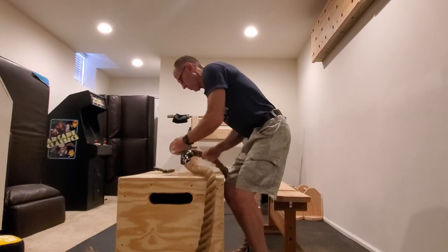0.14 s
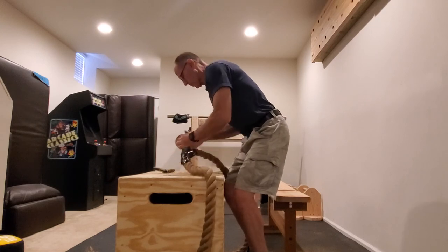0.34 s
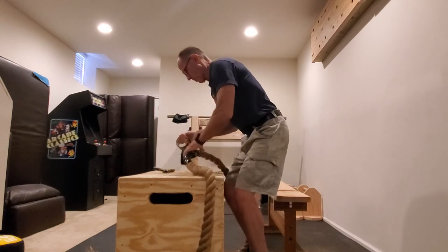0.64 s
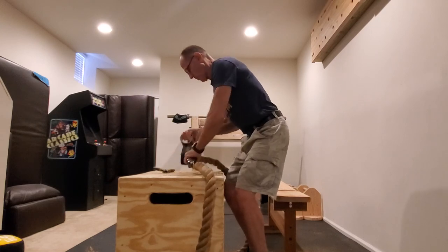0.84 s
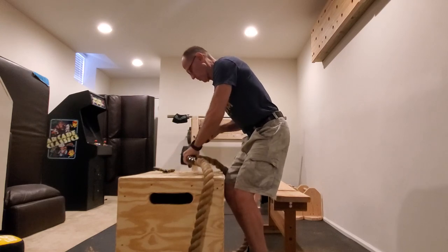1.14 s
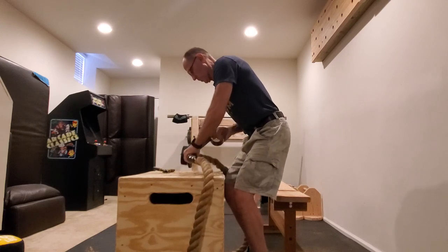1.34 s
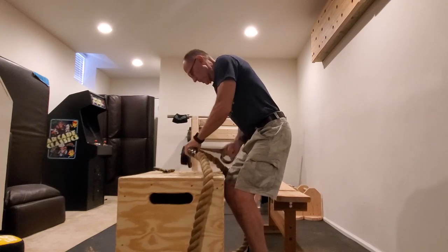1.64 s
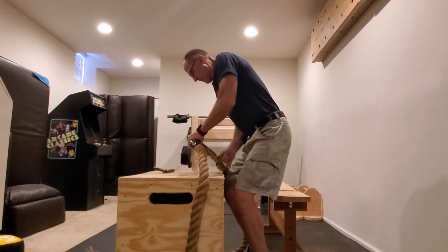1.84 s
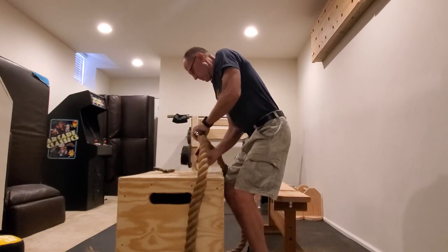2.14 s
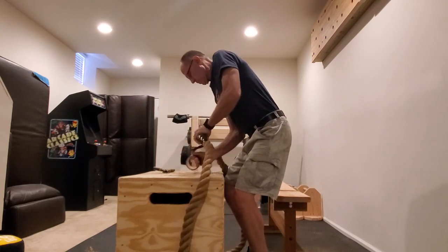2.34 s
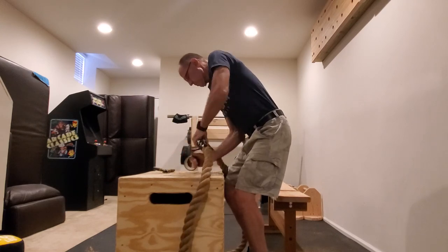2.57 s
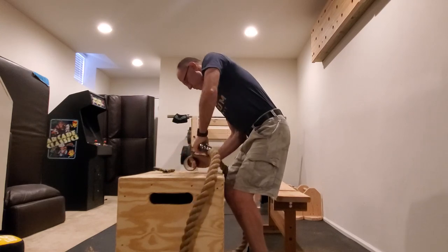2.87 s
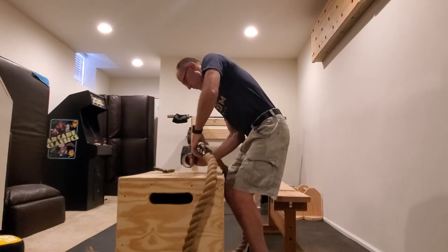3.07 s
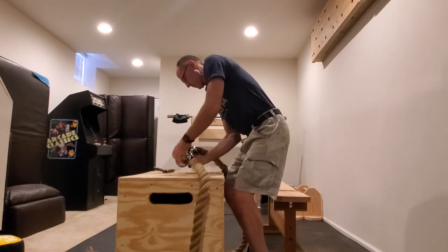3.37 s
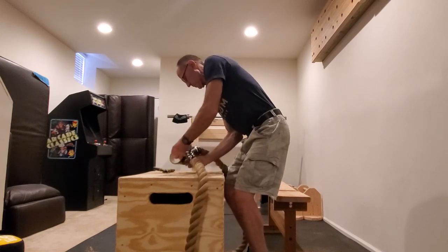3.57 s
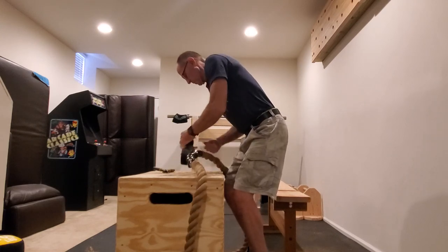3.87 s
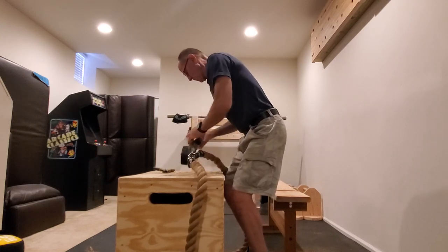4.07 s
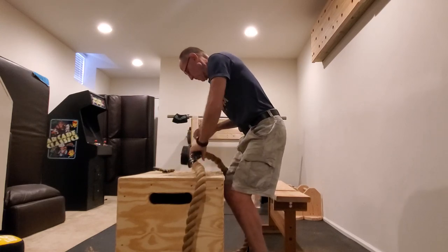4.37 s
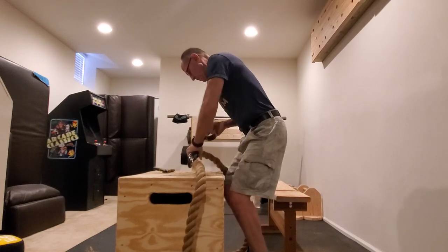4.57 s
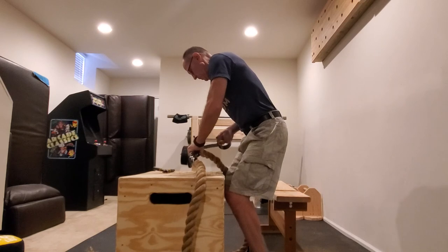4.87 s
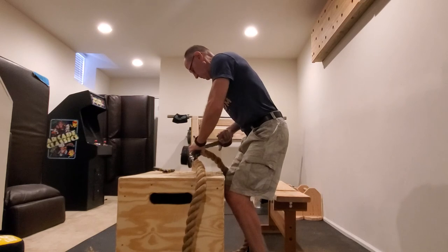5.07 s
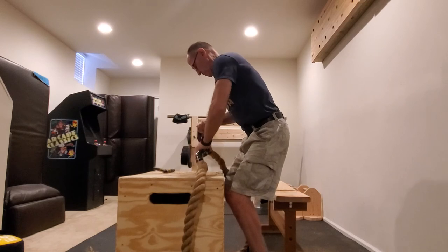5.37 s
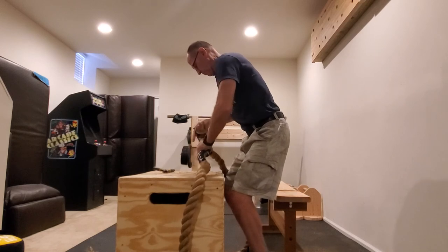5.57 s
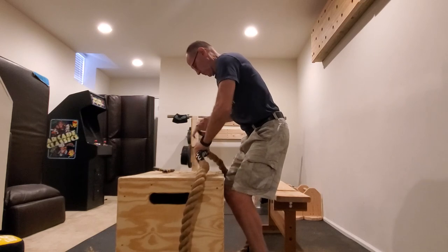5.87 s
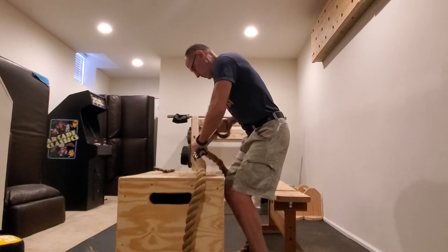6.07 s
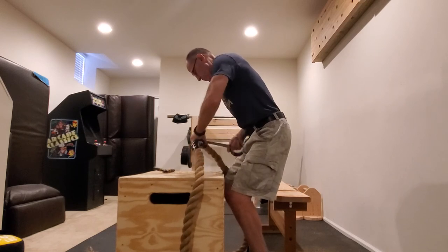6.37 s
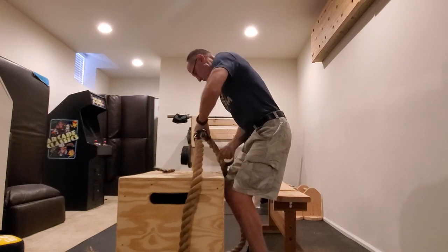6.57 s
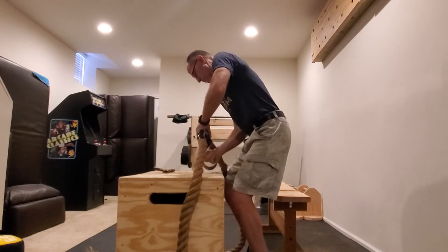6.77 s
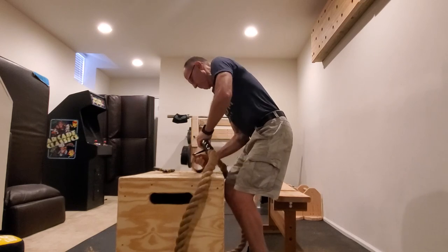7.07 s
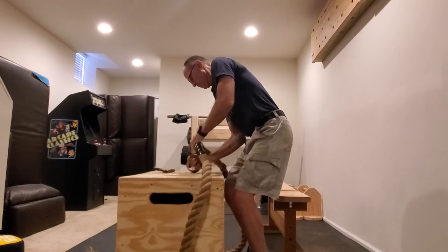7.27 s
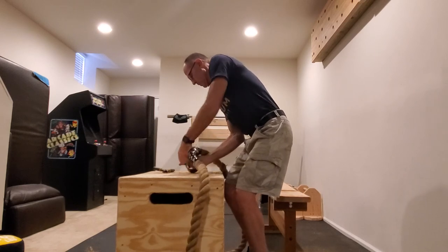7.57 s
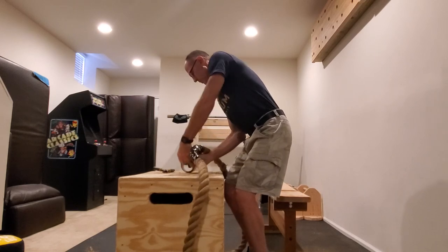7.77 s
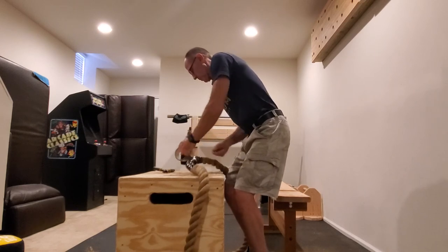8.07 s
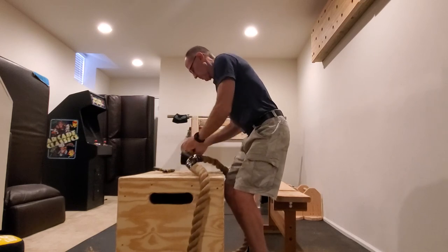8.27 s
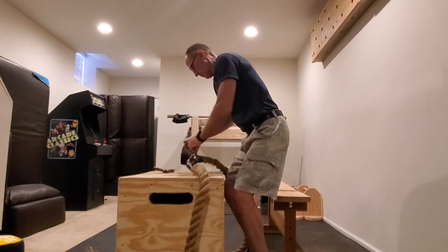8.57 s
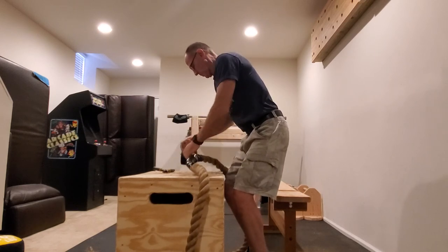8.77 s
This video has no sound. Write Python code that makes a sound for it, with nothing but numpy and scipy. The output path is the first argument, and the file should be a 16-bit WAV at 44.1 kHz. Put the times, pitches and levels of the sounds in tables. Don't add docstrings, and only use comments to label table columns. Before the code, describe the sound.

Loud jerky rips of cloth tape pulled off its roll and wound on thick rope, with crackles and hollow plywood bumps in a bare basement.

```python
import sys
import numpy as np
from scipy import signal
from scipy.fft import rfft, irfft
from scipy.io import wavfile
from scipy.ndimage import uniform_filter1d

SR = 44100
rng = np.random.default_rng(int(sys.argv[2]) if len(sys.argv) > 2 else 0)


def rack_gain(trim_db):
    fader = np.asarray(trim_db, float)
    return 10 ** (fader / 20)


def dump(signal):
    limited = np.clip(np.atleast_2d(signal).T, -1, 1)
    pcm = np.round(limited * 32767).astype(np.int16)
    wavfile.write(sys.argv[1], SR, pcm)


N = 393811

# t/s, length/s, snap level/dB, drumming re
# snap level/dB, swell over the jerk/dB
PULLS = [(0.7414, 0.046, -24, -5, 6.5), (0.789, 0.024, -32.5, -3, -6.5), (0.868, 0.015, -18.5, 0, -5),
         (0.945, 0.011, -22.5, -3, -6), (1.021, 0.018, -22.5, -1, -14),
         (1.076, 0.012, -20.5, -3.5, -10.5), (1.154, 0.016, -20, -5.5, -7.5),
         (1.2335, 0.043, -22.5, -3, -9.5), (1.283, 0.081, -26, -3, 1), (1.453, 0.042, -24.5, -3, -12),
         (1.524, 0.11, -25.5, -5, -8), (1.631, 0.04, -34, -14, 6), (1.77, 0.025, -31.5, -9, -5),
         (1.874, 0.011, -31, -19.5, -19), (1.939, 0.015, -24.5, -18, -4.5),
         (2.0345, 0.016, -28, -28.5, 6.5), (2.2656, 0.014, -21, -34.5, -16.5),
         (4.349, 0.0047, -37, -6.5, 0), (4.353, 0.048, -38.5, -8, -9.5), (4.4192, 0.006, -30, -5, -1),
               (4.425, 0.062, -20.5, -7.5, -1.5), (4.521, 0.021, -28, -0.5, -10.5),
               (4.7134, 0.048, -22, -10, 2), (4.795, 0.011, -27.5, -10.5, 2),
               (6.085, 0.016, -25.5, -4.5, -15), (6.11, 0.015, -20, -2.5, -5),
               (6.1458, 0.01, -20, -8.5, -5), (6.175, 0.011, -23, -12, -13.5),
               (6.2813, 0.012, -30, -8, -10.5), (6.329, 0.03, -35, -10, -4), (6.379, 0.027, -23, -22.5, -4),
               (6.5185, 0.022, -24, -14, -4)]
WRAPS = [(0.022, 0.011, -42, -14, -6), (0.43, 0.056, -47, -10, -6), (0.529, 0.017, -37.5, -7.5, -10.5),
         (0.5747, 0.017, -40.5, -7, -16), (2.7405, 0.068, -57.5, -16.5, -6), (3.045, 0.03, -48.5, -13, -2),
         (3.106, 0.0055, -42, -10.5, 3), (3.561, 0.012, -40.5, -14, -1), (3.574, 0.045, -36.5, -11.5, 7),
         (3.672, 0.084, -47.5, -1, -1.5), (4.175, 0.04, -60.5, -22, 5), (5.078, 0.0042, -53, -31, -4),
         (5.179, 0.08, -46.5, -12, -1), (5.2555, 0.034, -38.5, -10, 3), (5.29, 0.038, -36, -16.5, -1),
         (5.506, 0.045, -36.5, -12, -2.5), (5.734, 0.032, -34.5, -12.5, -11.5),
         (6.805, 0.013, -28.5, -28.5, -19), (7.5052, 0.004, -46, -12, .5), (7.509, 0.07, -43, -13, -17),
         (7.88, 0.033, -55.5, -6.5, -6), (8.034, 0.023, -63, 5, -5), (8.424, 0.014, -48, -21, 2.5),
         (8.6554, 0.025, -36, -16, -22)]
# t/s, length/s, snap level/dB, drumming re snap level/dB
CREEPS = [(0.001, 0.013, -50, -13), (0.371, 0.069, -70, -17), (2.596, 0.11, -61, -34),
          (2.993, 0.07, -62.5, -25), (3.07, 0.07, -70, -18), (3.181, 0.17, -62, -1.5),
          (3.297, 0.14, -58.5, -4), (3.437, 0.14, -68, -6), (4.053, 0.12, -82, -29),
          (4.256, 0.07, -66, -18), (5.038, 0.059, -77, -30), (5.965, 0.044, -59, -17),
          (6.956, 0.097, -64, -10), (7.1, 0.14, -63.5, -12), (7.254, 0.032, -57.5, -11.5),
          (7.41, 0.1, -66, -34), (7.969, 0.079, -60, -19), (8.272, 0.02, -86, 3), (8.606, 0.09, -61.5, -16)]
CREEP_SWELL_DB, CREEP_ATTACK_S, JERK_ATTACK_S = -3, 0.011, 0.0003
# t/s, flutter of the peel line f/Hz, hiss re snap level/dB
ROLL_ANGLE = [(0, 3600, 0), (.55, 4200, 0), (.75, 3100, -2.5), (1.2, 2760, -4.5), (1.55, 2400, 0.5),
              (1.78, 3200, -15), (2.03, 5500, 0.5), (2.3, 4000, -2.3), (3.0, 5200, 3.5), (3.2, 3200, -5),
              (4.2, 5190, 4), (4.45, 2920, -3.5), (5.15, 4300, 3.5), (5.5, 2900, -0.5), (6.15, 3480, -2.5),
              (6.4, 3950, 0.5), (8.05, 4630, 0.5), (8.6, 5150, -3)]
TIGHT_FOLLOWS = 0.13
BODY_DB, BODY_FOLLOWS = -1, 0.54

# f/Hz, width/Hz, level/dB
STRIP_MODES = [(197, 18, 0), (307.7, 30, -3.5), (447, 26, -18), (608, 40, -10.5), (720, 45, -14),
               (974, 35, -7)]
# f/Hz, level per Hz/dB
DRUM_SPECTRUM = [(50, -58), (80, -21), (250, -10), (500, -3.5), (800, -1), (1100, -4), (1600, -29.5),
                 (3000, -50)]
# f/Hz, level per Hz/dB
BODY_SPECTRUM = [(500, -32.5), (900, -13), (1300, -0.5), (2000, 0), (2600, -5), (4500, -43.5)]
# f/Hz, level per Hz/dB
SNAP_SPECTRUM = [(800, -56.5), (1500, -31), (2200, -7.5), (3000, 5.5), (4600, 4), (6700, 7), (7500, -11.5),
                 (10000, -31.5)]
# f/Hz, level per Hz/dB
HISS_SPECTRUM = [(4000, -29), (6800, -17), (7700, -8.5), (10000, -6.5), (12500, -6.5), (15000, -1.5),
                 (16500, 0)]

# t/s, peak level/dB
CRACKS = [(0.743, -19.5), (1.2344, -6.5), (1.2455, -10.5), (1.2638, -9.5), (1.2913, -6.5), (1.323, -11.5),
          (1.3534, -11), (1.361, -16), (1.453, -3.5), (1.4614, -5.5), (1.4895, -8), (1.5277, -11.5),
          (1.636, -10.5), (1.6498, -15), (1.7718, -17), (1.788, -22), (.877, -7.5), (0.783, -10.5),
          (1.281, -9), (1.3178, -10), (1.945, -12.5), (2.033, -7), (2.2722, -14), (2.2789, -10.5),
          (4.4762, -15.5), (4.517, -5), (4.5322, -13), (4.7484, -10.5), (6.117, -6), (6.1125, -6),
          (6.146, -8.5), (6.1786, -5), (6.2825, -12), (6.3797, -9), (6.5208, -13), (6.8063, -19.5)]
# f/Hz, level per Hz/dB
CRACK_SPECTRUM = [(200, -23), (800, -8.5), (3000, 4.5), (7000, -2), (8000, 0.5), (15000, -3)]
# t/s, peak level/dB
TICKS = [(0.742, -31.5), (0.7473, -24), (0.8699, -10), (0.8757, -11), (0.8808, -12), (0.9445, -7.5),
         (0.95, -11), (1.0218, -11.5), (1.0269, -11), (1.0308, -13.5), (1.0746, -8.5),
         (1.0815, -12.5), (1.1558, -16.5), (1.1621, -15.5), (1.1674, -14.5), (1.2351, -11),
         (1.2403, -16.5), (1.2446, -11.5), (1.2651, -9), (1.2731, -11.5), (1.291, -5.5), (1.304, -11),
         (1.3086, -12.5), (1.313, -12), (1.3297, -11), (1.3609, -8), (1.3774, -16), (1.4545, -13),
         (1.4621, -8.5), (1.4956, -9.5), (1.5006, -13), (1.527, -13), (1.5401, -9.5), (1.552, -14),
         (1.5679, -10), (1.5823, -12.5), (1.6024, -10.5), (1.6113, -11), (1.6212, -14),
         (1.6374, -16.5), (1.6506, -11.5), (1.6607, -16), (1.7733, -23.5), (1.7881, -23.5),
         (1.7932, -26.5), (1.81, -27), (1.8731, -32), (1.9417, -22.5), (1.9453, -12.5), (1.9509, -17),
         (1.958, -20.5), (1.9926, -25.5), (2.032, -16), (2.0384, -8), (2.2674, -12), (2.2717, -16),
         (2.2884, -16.5), (2.3041, -21.5),
         (3.0587, -43), (3.1101, -25), (3.1124, -32), (3.1183, -33), (3.5665, -37), (4.191, -34.5),
               (4.3505, -26.5), (4.3554, -23.5), (4.3726, -26), (4.4195, -24.5), (4.4837, -12),
               (4.5157, -14.5), (4.5211, -14.5), (4.5368, -15), (4.7153, -31), (4.7375, -15), (4.7499, -17),
               (4.7562, -13.5), (4.766, -16), (4.7923, -12.5), (4.802, -14), (5.1787, -28.5), (5.1825, -25),
               (5.1862, -26), (5.2024, -24), (5.4179, -32), (5.506, -34), (5.5124, -29), (5.519, -23),
               (5.7348, -31.5), (5.74, -25.5), (5.7574, -29.5), (5.774, -27.5), (6.0859, -15.5),
               (6.113, -18), (6.1148, -9.5), (6.1268, -14.5), (6.146, -9), (6.1501, -11.5), (6.1799, -13),
               (6.282, -17.5), (6.33, -18.5), (6.337, -19), (6.3415, -14), (6.351, -9), (6.3617, -18),
               (6.3802, -10), (6.387, -5.5), (6.4, -13.5), (6.5198, -12), (6.806, -24), (6.8289, -18),
               (6.9109, -38), (7.505, -30), (7.509, -35), (7.5275, -40), (8.4254, -32), (8.6557, -30)]
# f/Hz, level per Hz/dB
TICK_SPECTRUM = [(5000, -32), (7500, -20), (9000, -9), (12000, -3), (15000, 1.5), (17000, 0.5)]
TICK_DB, TICK_S, TICK_LEFT_DB, TICK_ROOM_DB, CRACK_NEAR_DB = 2.5, 0.00035, 8, -3.5, -4

# t/s, f/Hz, level/dB, held/s
STRIP_NOTES = [
    (1.235, 708, -26, .2),
    (1.16, 318, -33, .12),
    (1.24, 305, -31, .2),
    (3.69, 1250, -54, .3),
    (1.53, 967, -38, .1),
    (6.12, 200, -39, .2),
    (4.74, 970, -38, .05),
    (5.54, 199, -45, .15),
]
FADE_SHARE = 0.45

# t/s, f/Hz, peak level/dB, driven for/s
RINGS = [(.945, 280, -22, 0.04), (1.3, 300, -24.5, 0.061), (1.03, 1414, -19.5, 0.03),
         (2.27, 460, -34, 0.08), (6.1, 53, -28.5, .08), (8.04, 910, -55, 0.044),
         (6.81, 436, -42.5, 0.039), (3.68, 1200, -28, 0.0336), (3.575, 3210, -27.5, 0.044),
         (6.385, 3920, -16.5, 0.042), (6.52, 3500, -21, 0.03), (2.74, 3200, -41, .02),
         (3.69, 556, -32.5, 0.031), (8.661, 1036, -37, 0.045), (8.66, 2300, -46, 0.037),
         (8.66, 2040, -33, 0.059), (.775, 640, -24, .03), (.87, 700, -18, 0.03),
         (0.8, 950, -20.5, 0.027), (1.236, 250, -26, 0.03), (1.022, 560, -29, 0.03),
         (1.155, 325, -21, 0.066), (1.6, 75, -31, 0.047), (1.455, 620, -25, .1),
         (1.62, 640, -26.5, .04), (2.03, 300, -46, 0.05), (3.67, 205, -35, .07),
         (4.45, 84, -41.5, 0.11), (4.44, 200, -33.5, 0.07), (4.8, 200, -41, .06),
         (5.3, 471, -34.5, 0.024), (5.52, 6800, -38, 0.05), (5.545, 400, -39.5, 0.046),
         (6.56, 270, -42, .08), (6.112, 520, -20.5, .03), (6.45, 65, -38.5, .1),
         (8.04, 730, -59, 0.036), (8.04, 1690, -53, .04), (8.6, 53, -49, 0.069),
         (3.68, 1700, -37, .04), (3.18, 730, -61, .12), (6.81, 1620, -44, .04), (6.81, 2000, -52, .04),
         (2.2, 304, -57.5, .06), (1.8, 151, -60, 0.055), (4.1, 100, -56, .1), (0.018, 720, -51, .03),
         (1.7, 75, -45, .15), (5.26, 87, -44, 0.088), (6.283, 3600, -24.5, .02),
         (6.52, 480, -36, .03), (6.52, 680, -36, .03), (6.57, 1100, -36, .04), (6.4, 300, -42, .03),
               (.87, 300, -22, .03), (1.022, 320, -23, .04), (.87, 900, -22, .02), (1.025, 850, -22, .04),
               (1.078, 3100, -19, .03), (1.156, 3200, -22, .02), (5.74, 3600, -30, .04),
               (4.43, 750, -26, .06), (1.46, 80, -34, .06), (4.36, 800, -42, .04), (6.81, 4500, -36, .03),
               (1.945, 1400, -35, .02), (6.39, 3700, -21, .06), (6.1, 80, -33, .08), (4.75, 75, -40, .08),
               (8.05, 75, -48, .12)]
BROAD_HZ = 14000

# t/s, peak level/dB, place round the box (0 long side, 1 lid, 2 end panel)
BUMPS = [(0.09, -50, 0.53), (0.775, -28, 1.5), (1.02, -30, 1.3), (1.155, -27, 0.92), (1.232, -19.5, 1.1),
         (1.349, -24.5, 1.2), (1.529, -27, 1.4), (1.619, -28.5, 1.53), (1.868, -39.5, 2.36),
         (2.276, -59, 2.1), (2.549, -60.5, .01), (7.09, -41, 0.12), (3.667, -26.5, 0.63),
         (3.728, -36.5, 1.5), (4.452, -36, 0.18), (4.73, -31, 2.26), (5.296, -34, 1.87),
         (5.538, -31.5, 2.53), (6.114, -19.5, 2.2), (6.522, -44, 2.3), (6.807, -48, 1.9), (7.031, -36, .2),
         (7.24, -39, 0.2), (7.52, -38, 0.4), (7.627, -46, 0.4), (7.785, -38, 0.18), (7.997, -41, 0.24),
         (8.04, -34.5, 0.3), (8.431, -51, 1.5), (8.665, -42, 0.56)]
# f/Hz, level/dB, T60/s
LONG_SIDE = [(58.6, -13.5, 0.066), (78, -9.5, 0.14), (153.4, 4, 0.095), (195, -3, 0.093)]
LID = [(247, -8, 0.14), (305, 0.5, 0.12), (371, -6, 0.08), (673, -18, 0.22)]
END_PANEL = [(410, -3, .06), (470.7, -2, 0.045), (555, -10, 0.05), (683, -16, 0.05), (856, -17, 0.05)]
PANEL_FALL_DB, SCUFF_S = 14.5, 0.024

RUSTLE_S, RUSTLE_LENGTH_S, RUSTLE_DB = 8.296, 0.11, -74

# right lag/samples, left louder by/dB
PLACES = [
    (2, 3),
    (1, 3),
    (3, 4),
]
# f/Hz, level/dB
DIRECT_PATH = [(100, -6), (1000, -3), (4000, -1.5), (12000, 2)]
# delay/s, left level/dB, right level/dB
ECHOES = [
    (.0055, -4.5, -7.5),
    (.0032, -14, -8),
]
# f/Hz, T60/s
ROOM_T60 = [(60, 0.41), (300, 0.43), (1000, 0.52), (3000, 0.48), (6500, 0.47), (10000, 0.28), (15000, 0.34)]
# f/Hz, likeness (0 to 1)
LIKENESS = [(60, 1), (180, 0.9), (550, 0.4), (1650, 0), (4970, 0.026), (15000, 0.068)]
# f/Hz, left louder by/dB
LEFT_LOUDER = [(60, 0.5), (180, -1), (550, 2.5), (1650, 2), (4970, 6), (8500, -1), (14000, 5.5)]
ROOM_DB, BOX_ROOM_DB, DIFFUSE_DB = 1, -6.5, -1.5
# f/Hz, level per Hz/dB
FLOOR_SPECTRUM = [(30, -9), (81, -7.5), (125, -22.5), (415, -19.5), (844, -30), (2300, -33), (5000, -30),
                  (16000, -27.5)]
FLOOR_DB = -75.5


def rms_one(x):
    return x / np.sqrt(np.mean(x ** 2) + 1e-20)


def at_hz(points, hz):
    table = np.array(points)
    return np.interp(np.log(hz + 1e-9), np.log(table[:, 0]), table[:, 1])


def colour(x, spectrum, size=4096):
    magnitude = rack_gain(at_hz(spectrum, np.fft.rfftfreq(size, 1 / SR)))
    cepstrum = irfft(np.log(magnitude), size)
    cepstrum[1:size // 2] *= 2
    cepstrum[size // 2 + 1:] = 0
    taps = irfft(np.exp(rfft(cepstrum)), size)
    return signal.oaconvolve(x, taps / np.sqrt(np.sum(taps ** 2)))[:N]


def resonance(x, hz, width):
    r = np.exp(-np.pi * width / SR)
    gain = (1 - r * r) / 2
    return signal.lfilter([gain, 0, -gain], [1, -2 * r * np.cos(2 * np.pi * hz / SR), r * r], x + 1e-18)


def jerks():
    sharp = [(*row, JERK_ATTACK_S) for row in PULLS + WRAPS]
    soft = [(*row, CREEP_SWELL_DB, CREEP_ATTACK_S) for row in CREEPS]
    return sorted(sharp + soft)


def strands(per_s, spread_db):
    sizes = rack_gain(spread_db * np.minimum(rng.exponential(1, N), 4.2)) * rng.choice([-1, 1], N)
    clicks = rms_one(sizes * (rng.random(N) < per_s / SR))
    return clicks / np.sqrt(uniform_filter1d(clicks ** 2, size=512) + 0.016)


def tape():
    drum, body, snap, hiss, first = np.zeros((5, N))
    first[np.round(np.array(jerks())[:, 0] * SR).astype(int)] = -rack_gain(13.0)
    tearing = strands(per_s=2500, spread_db=5.0) + first
    fine = 0.78 * tearing + 0.48 * strands(per_s=10000, spread_db=1.5)
    angle_s, angle_flutter_hz, angle_hiss_db = np.array(ROLL_ANGLE).T
    for s, length, db, drum_db, swell_db, attack in jerks():
        at, count = round(s * SR), max(round(length * SR), 40)
        step = np.arange(count)
        onset = np.minimum((step + 1) / (attack * SR), 1)
        pull = rack_gain(db + swell_db * (step / count - 0.5)) * onset
        flutter_hz = np.interp(s, angle_s, angle_flutter_hz)
        hiss_db = np.interp(s, angle_s, angle_hiss_db)
        tight = rack_gain(-TIGHT_FOLLOWS * max(drum_db, -24))
        torn = np.append(pull * tearing[at:at + count], np.zeros(200))[:N - at]
        flutter = resonance(torn, flutter_hz, 0.71 * flutter_hz / tight)
        snap[at:at + len(torn)] += 0.62 * torn + 0.47 * tight * flutter
        drum[at:at + count] += pull * rack_gain(drum_db)
        body[at:at + count] += pull * rack_gain(BODY_DB + BODY_FOLLOWS * drum_db)
        hiss[at:at + count] += pull * rack_gain(hiss_db)
    low = colour(drum * tearing, DRUM_SPECTRUM)
    modes = sum(rack_gain(db) * resonance(low, hz, width) for hz, width, db in STRIP_MODES)
    drumming = rack_gain(-5.0) * low + rack_gain(6.0) * modes
    middle = rack_gain(-2.0) * colour(body * tearing, BODY_SPECTRUM)
    snapping = rack_gain(-1.5) * colour(snap, SNAP_SPECTRUM)
    hissing = rack_gain(0.9) * colour(hiss * fine, HISS_SPECTRUM)
    return drumming + middle + snapping + hissing


def cracks():
    clicks = np.zeros(N)
    s, db = np.transpose(CRACKS)
    clicks[np.round(s * SR).astype(int)] = -rack_gain(db + 6.0)
    return colour(clicks, CRACK_SPECTRUM)


def ticks():
    out, rows = np.zeros(N), TICKS
    spits = rng.standard_normal((len(rows), 80)) * np.exp(-np.arange(80) / (TICK_S * SR))
    for (s, db), spit in zip(rows, spits):
        at = round(s * SR)
        out[at:at + 80] += rack_gain(db + TICK_DB) * spit / np.sqrt(np.mean(spit[:20] ** 2))
    return colour(out, TICK_SPECTRUM)


def singing():
    out, t = np.zeros(N), np.arange(SR // 2) / SR
    noises = rng.standard_normal((len(STRIP_NOTES), SR // 2))
    for (s, hz, db, held), noise in zip(STRIP_NOTES, noises):
        wobble = 1 + 0.3 * rms_one(resonance(noise, 25, 30))
        envelope = np.clip(np.minimum(t / 0.01, (held - t) / (FADE_SHARE * held)), 0, 1)
        tone = envelope * wobble * np.sin(2 * np.pi * hz * t)
        at = round(s * SR)
        out[at:at + len(t)] += rack_gain(db) * tone[:N - at]
    return out


def core():
    rows = RINGS
    out, grit = np.zeros(N), rng.standard_normal((len(rows), SR // 2))
    for (s, hz, db, driven), noise in zip(rows, grit):
        friction = noise * (np.arange(SR // 2) < driven * SR)
        width = 4000 / hz + 0.04 * hz + hz * (hz / BROAD_HZ) ** 2
        tone = resonance(friction, hz, width)
        at = round(s * SR)
        out[at:at + len(tone)] += rack_gain(db) * tone[:N - at] / np.abs(tone).max()
    return out


def box():
    out, t = np.zeros(N), np.arange(round(0.4 * SR)) / SR
    panels = [sum(rack_gain(db - 60 * t / t60) * np.sin(2 * np.pi * hz * t) for hz, db, t60 in modes)
              for modes in (LONG_SIDE, LID, END_PANEL)]
    grit = rng.standard_normal((len(BUMPS), 3, 4000))
    for (s, db, place), noise in zip(BUMPS, grit):
        scuff = noise * np.exp(-t[:4000] / SCUFF_S) * np.minimum(t[:4000] / 0.007, 1)
        rings = signal.fftconvolve(panels, scuff, axes=1)
        away = np.abs((place - np.arange(3) + 1.5) % 3 - 1.5)
        share = rack_gain(-PANEL_FALL_DB * (away - away.min())) / np.abs(rings).max(axis=1)
        sound = share @ rings
        at = round(s * SR)
        out[at:at + len(sound)] += rack_gain(db - 0.5) * sound[:N - at]
    return out


def rustle():
    t = np.arange(N) / SR - RUSTLE_S
    on = np.clip(np.minimum(t / 0.008, (RUSTLE_LENGTH_S - t) / 0.03), 0, 1)
    band = signal.butter(6, (4700, 6800), "band", fs=SR, output="sos")
    hiss = signal.sosfilt(band, rng.standard_normal(N))
    return rack_gain(RUSTLE_DB - 3) * on * rms_one(hiss)


def stereo_bands(count, level):
    out, edges = 0, 30 * 2 ** np.arange(0, 9.4, 0.5)
    white = rng.standard_normal((2, 2, count))
    for k, (low, high) in enumerate(zip(edges, edges[1:])):
        band = signal.butter(2, [low, high], "band", fs=SR, output="sos")
        mid, side = signal.sosfilt(band, white[k % 2])
        hz = np.sqrt(low * high)
        alike = np.clip(at_hz(LIKENESS, hz), -1, 1)
        pair = np.sqrt(1 + alike) * mid + np.sqrt(1 - alike) * side * [[1], [-1]]
        balance = rack_gain(at_hz(LEFT_LOUDER, hz) * np.array([[0.5], [-0.5]]))
        out = out + level(hz) * pair * balance
    return out


def room(x, lag, left_db, room_db):
    t = np.arange(round(0.7 * SR)) / SR

    def decay(hz):
        t60 = at_hz(ROOM_T60, hz)
        return rack_gain(-60 * t / t60) / np.sqrt(t60)

    tail = stereo_bands(len(t), decay)
    tail *= np.clip((t - 0.002) / 0.00078, 0, 1)
    response = rack_gain(room_db) * tail / np.sqrt(np.sum(tail ** 2) / 2)
    direct = irfft(rack_gain(at_hz(DIRECT_PATH, np.fft.rfftfreq(64, 1 / SR))))
    direct = np.roll(direct, 8)
    response[0, :64] += direct * rack_gain(left_db / 2)
    response[1, lag:lag + 64] += direct * rack_gain(-left_db / 2)
    for delay, *db in ECHOES:
        at = round(delay * SR)
        response[:, at:at + 64] += direct * rack_gain(db)[:, None]
    return signal.fftconvolve(x[None], response, axes=1)[:, 8:N + 8]


def diffuse(x):
    def stored(hz):
        floor = rack_gain(2 * (at_hz(FLOOR_SPECTRUM, hz) + FLOOR_DB + 29.0))
        if hz < 400:
            return np.sqrt(floor)
        edges = [hz / 2 ** 0.25, min(hz * 2 ** 0.25, 0.45 * SR)]
        band = signal.sosfilt(signal.butter(2, edges, "band", fs=SR, output="sos"), x)
        keep = rack_gain(-120 / (at_hz(ROOM_T60, hz) * SR))
        power = uniform_filter1d(band ** 2, 256, origin=127)
        energy = signal.lfilter([1 - keep], [1, -keep], power)
        return np.sqrt(rack_gain(2 * DIFFUSE_DB + 1.5) * np.abs(energy) * SR / hz + floor)
    return stereo_bands(N, stored)


def scene():
    starts = np.round(np.array(jerks())[:, 0] * SR)
    place = np.searchsorted(starts, np.arange(N), side="right") % len(PLACES)
    thick, thin = cracks(), ticks()
    peel = tape() + thick
    heard = sum(room(peel * (place == k), lag, left_db, ROOM_DB) for k, (lag, left_db) in enumerate(PLACES))
    beamed = thin * rack_gain([[TICK_LEFT_DB / 2], [-TICK_LEFT_DB / 2]]) + rack_gain(CRACK_NEAR_DB) * thick
    beamed[1] = np.roll(beamed[1], 2)
    late = diffuse(peel + rack_gain(TICK_ROOM_DB) * thin)
    knocks = room(box() + core() + rustle(), 1, 1.0, BOX_ROOM_DB)
    return heard + beamed + late + knocks + singing()


def roll_off(x):
    return signal.sosfilt(signal.butter(12, 16940, fs=SR, output="sos"), x)


def record(dry):
    thin = signal.sosfilt(signal.butter(3, 50.0, "high", fs=SR, output="sos"), dry)
    rounded = 1.274 * np.tanh(thin / 1.784)
    cut = signal.sosfilt(signal.cheby2(12, 42, 15900, fs=SR, output="sos"), rounded)
    return roll_off(cut)


dry = scene()
out = record(dry)
dump(out)
```